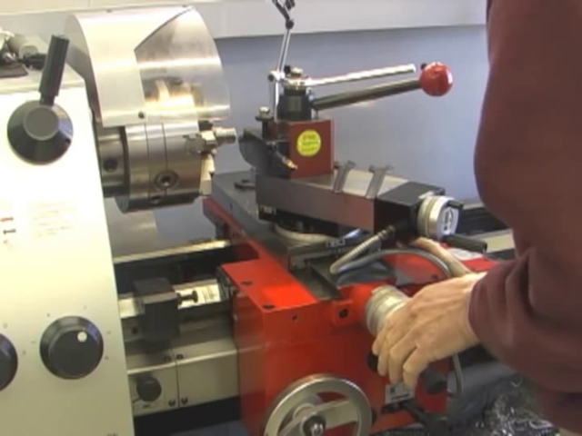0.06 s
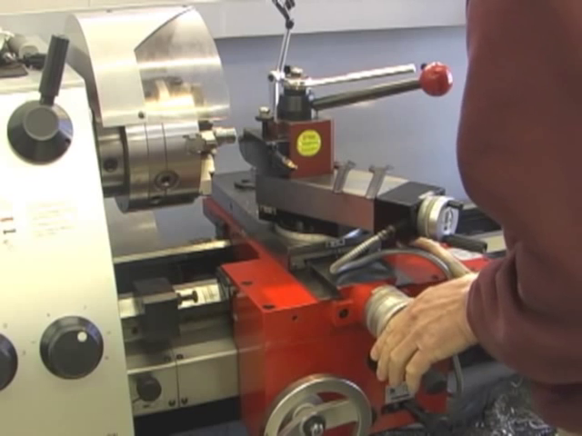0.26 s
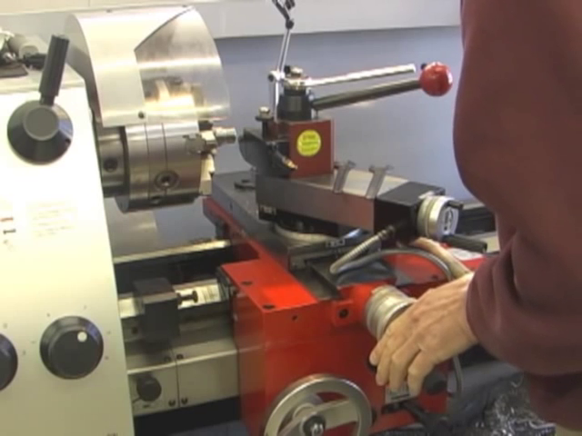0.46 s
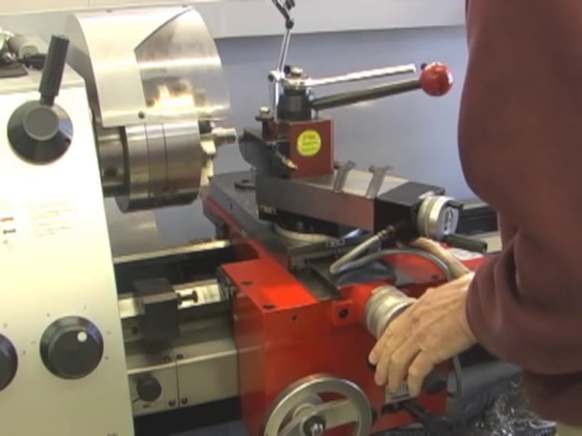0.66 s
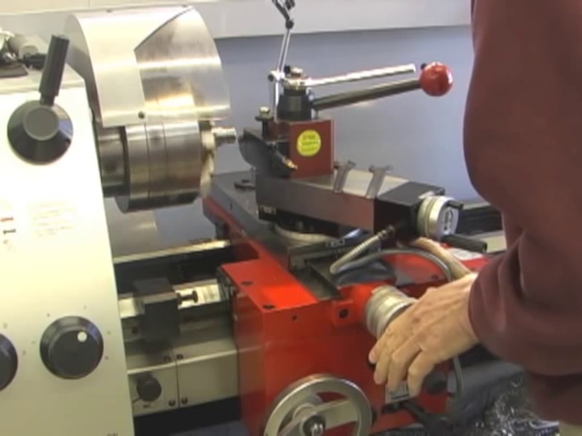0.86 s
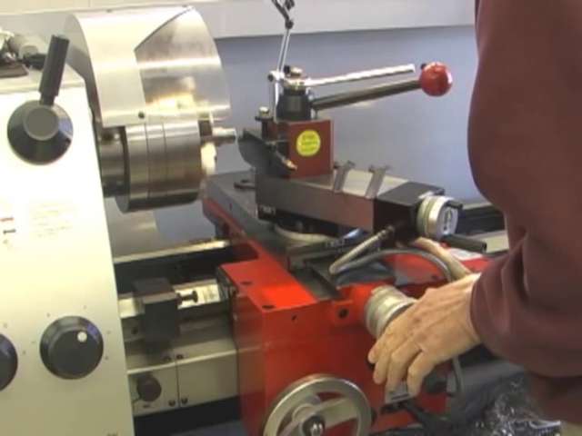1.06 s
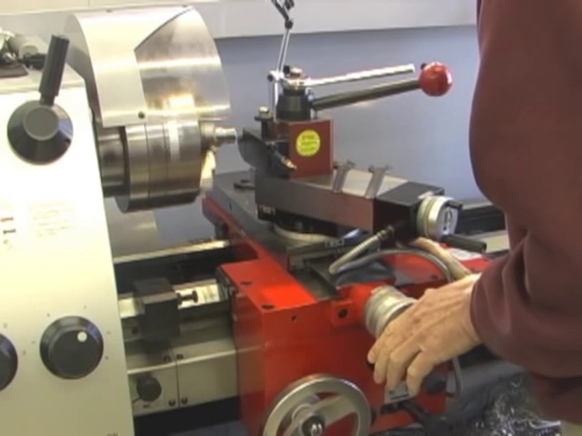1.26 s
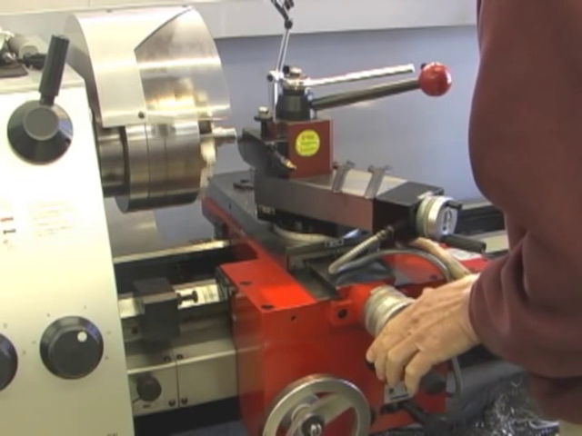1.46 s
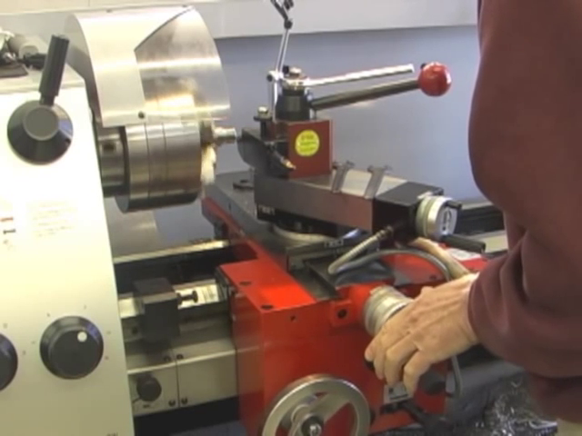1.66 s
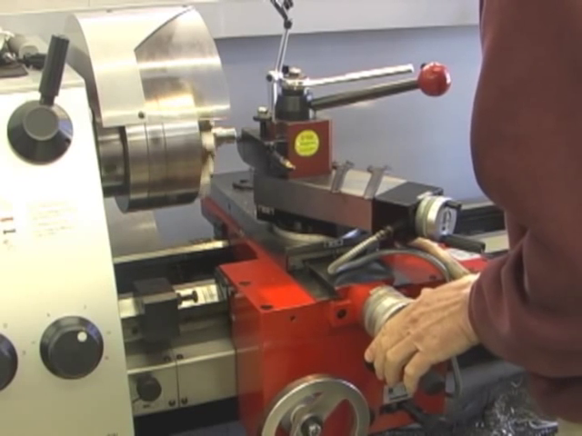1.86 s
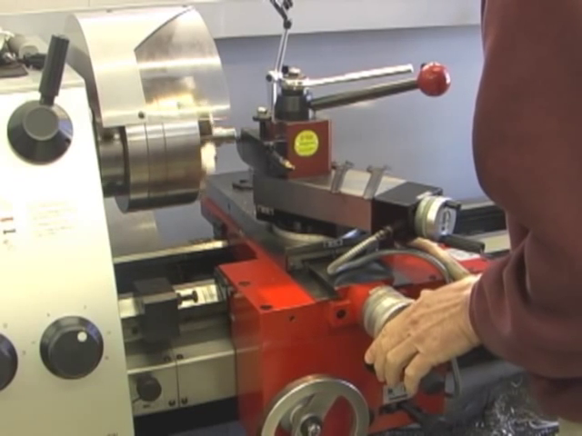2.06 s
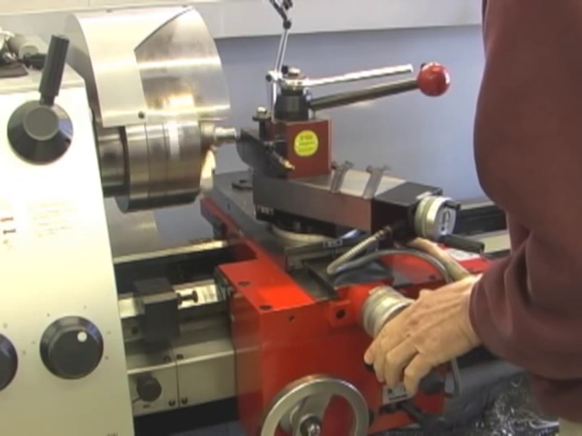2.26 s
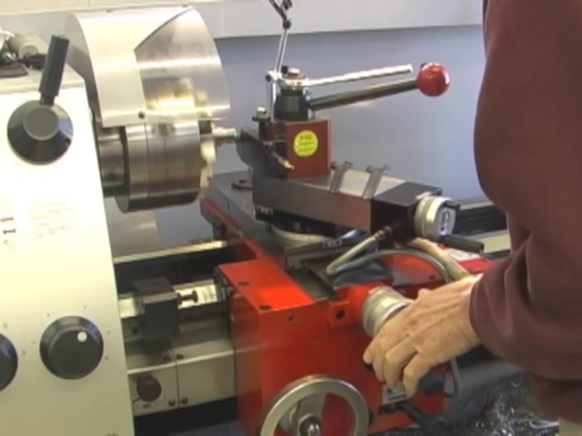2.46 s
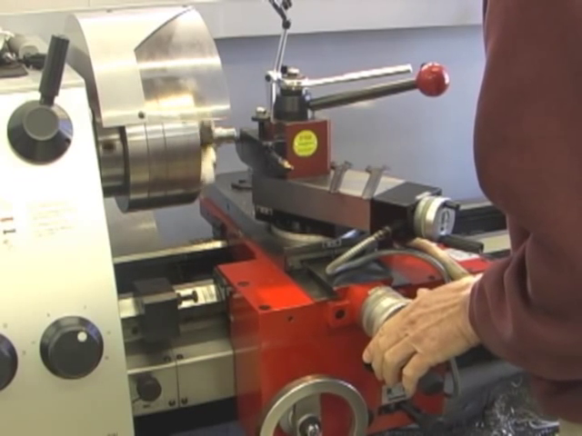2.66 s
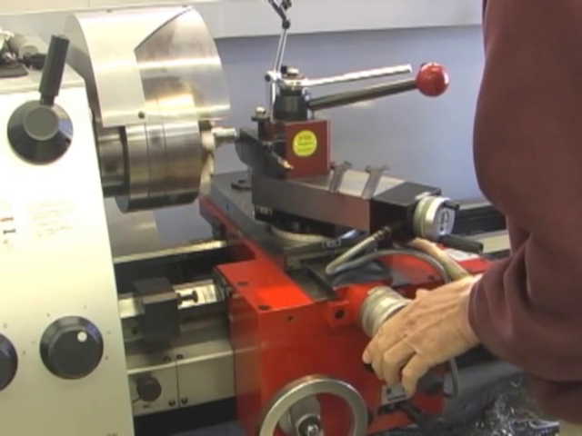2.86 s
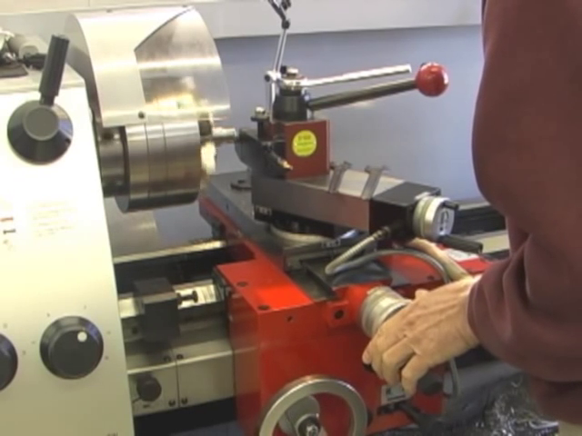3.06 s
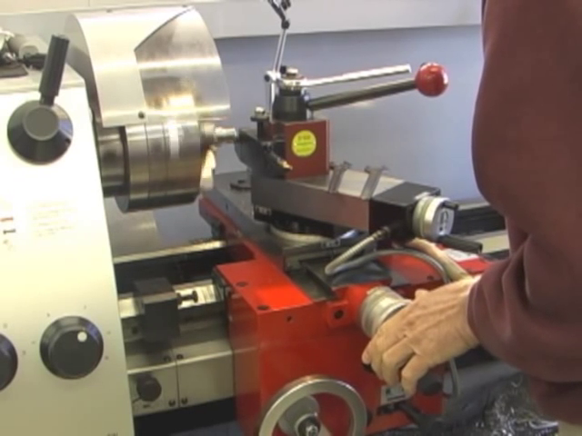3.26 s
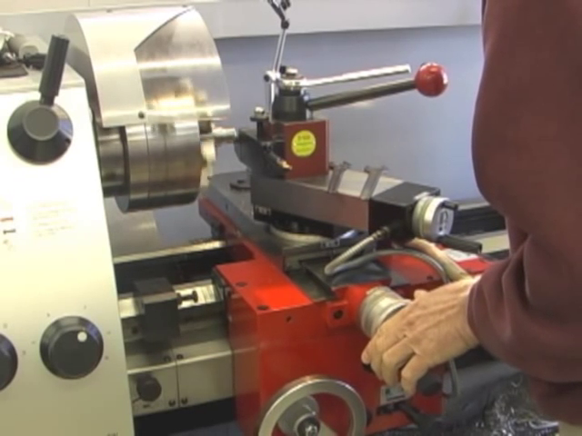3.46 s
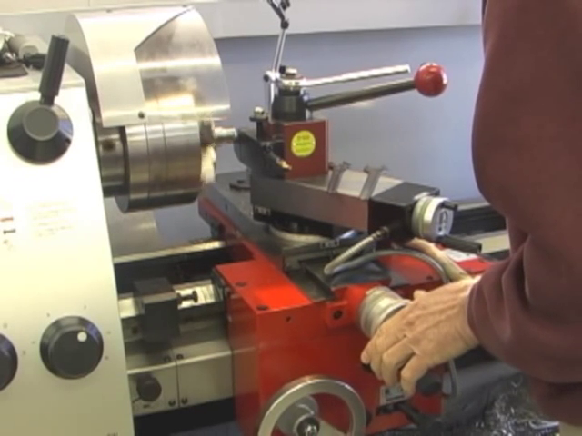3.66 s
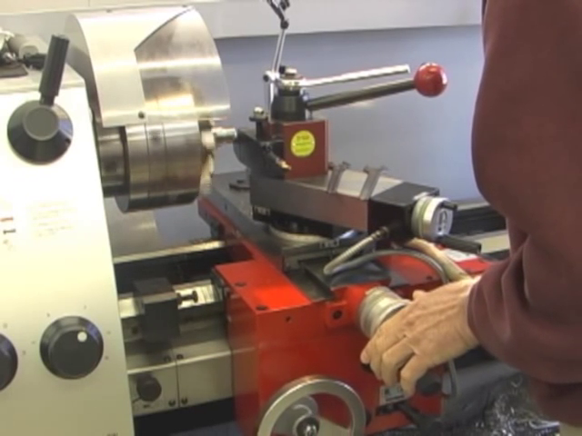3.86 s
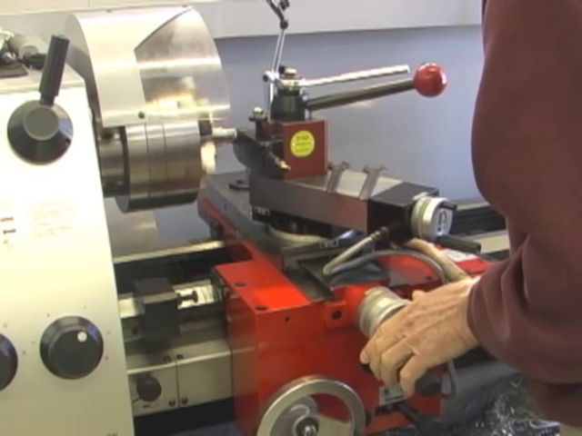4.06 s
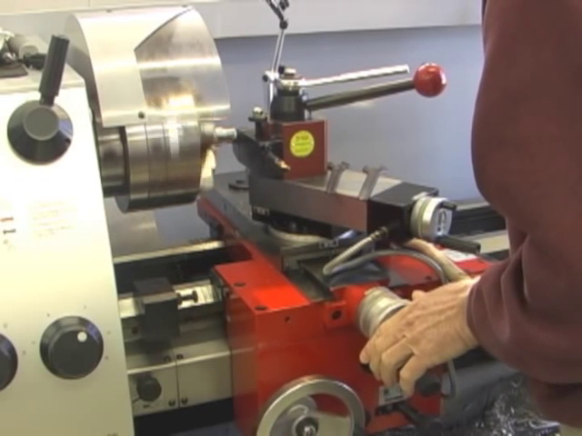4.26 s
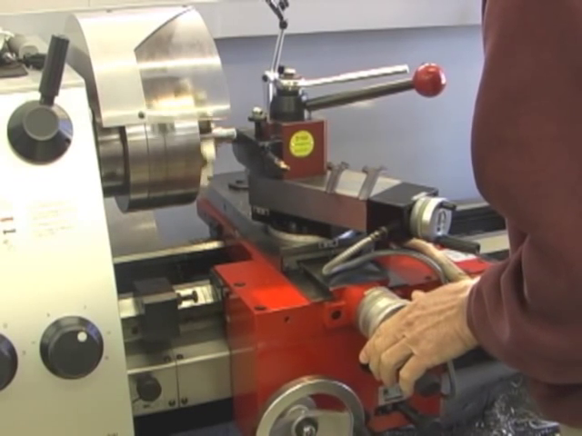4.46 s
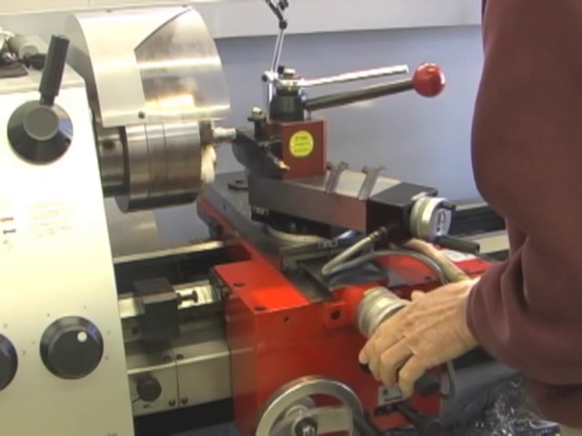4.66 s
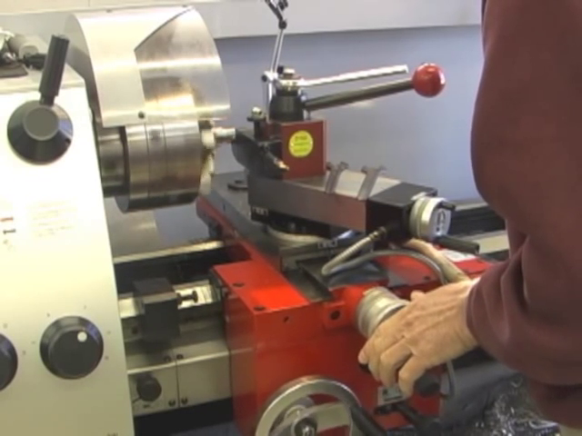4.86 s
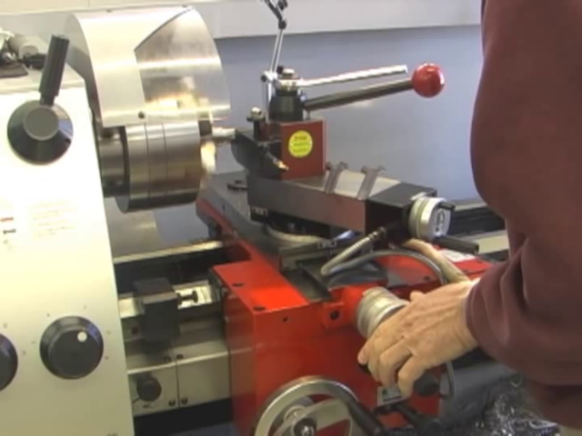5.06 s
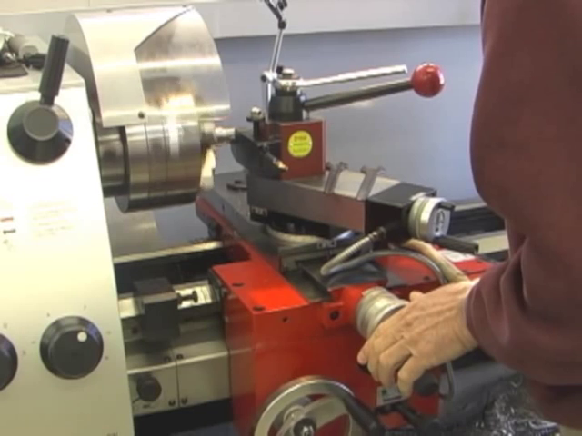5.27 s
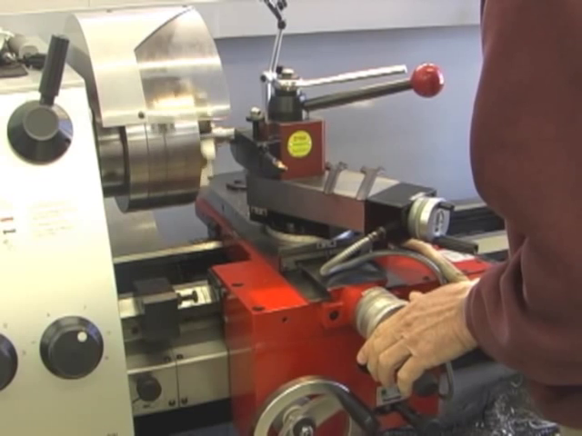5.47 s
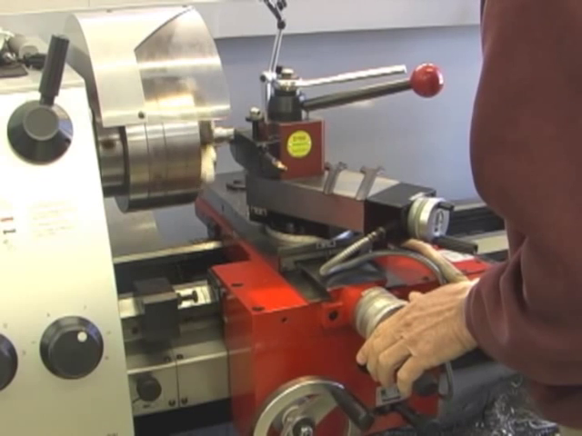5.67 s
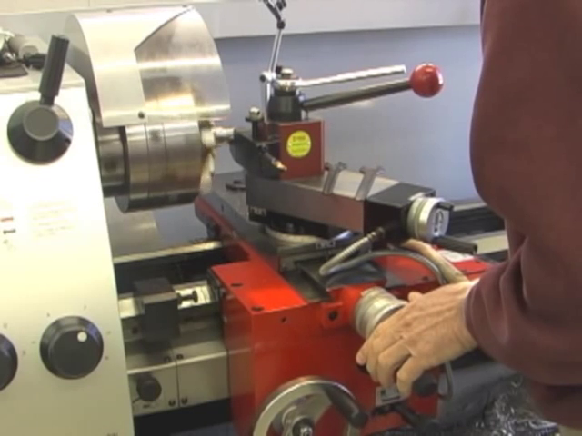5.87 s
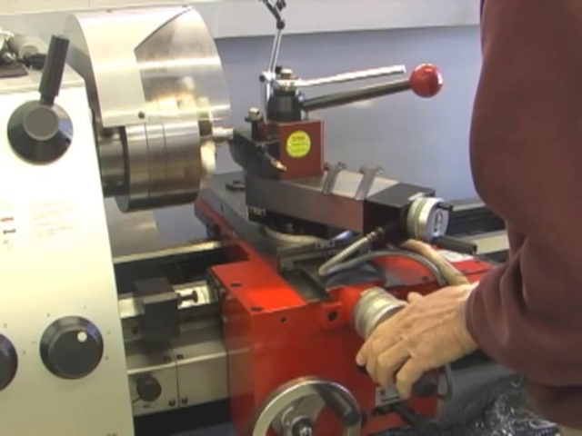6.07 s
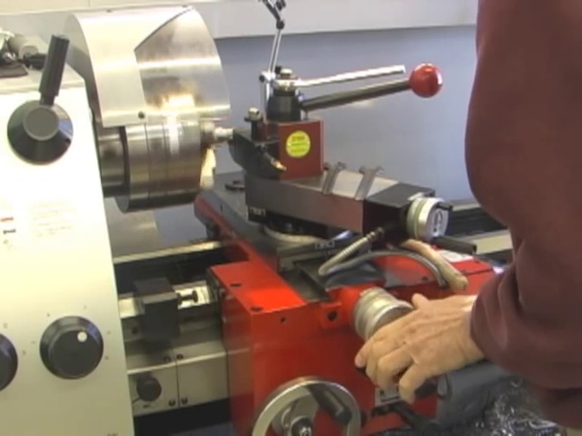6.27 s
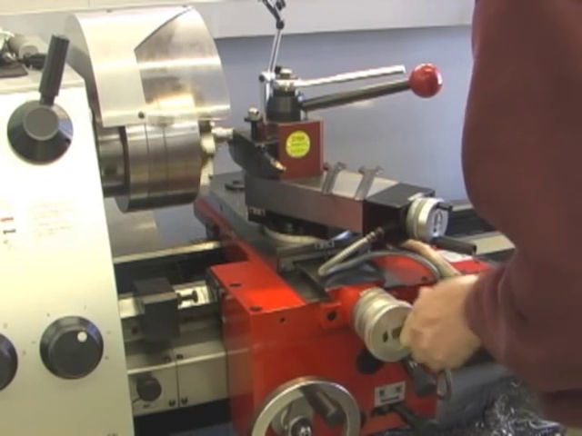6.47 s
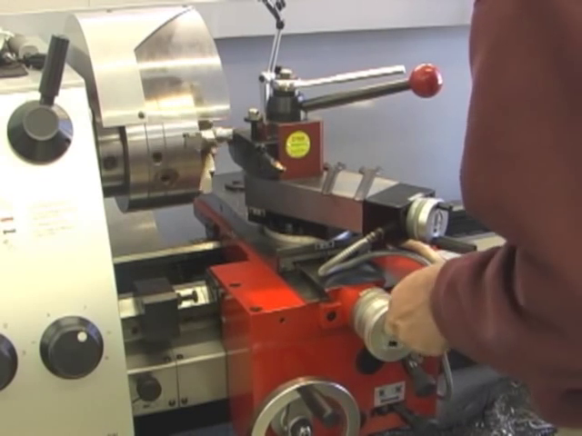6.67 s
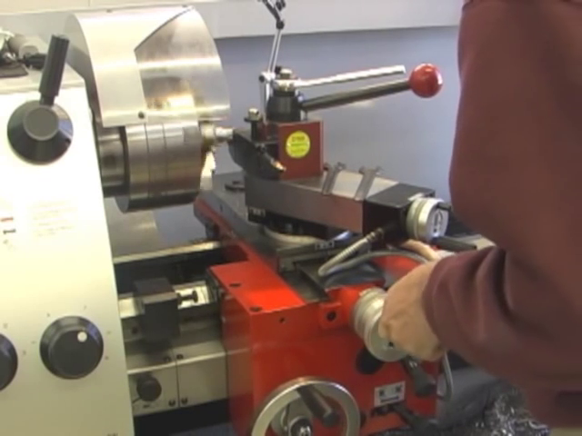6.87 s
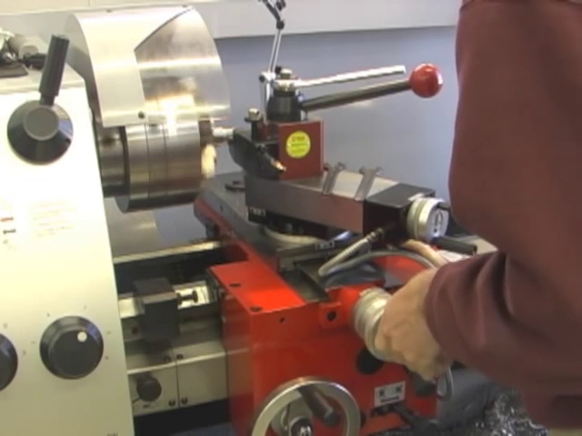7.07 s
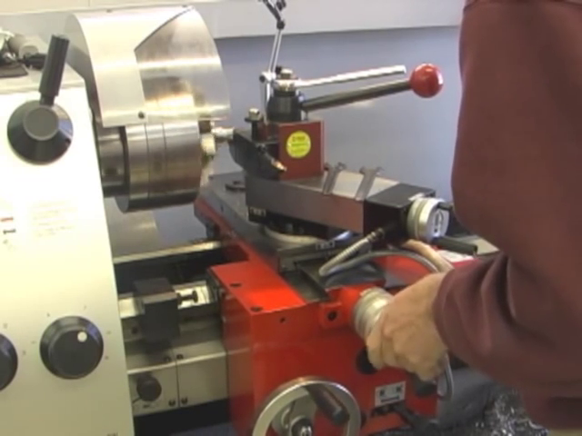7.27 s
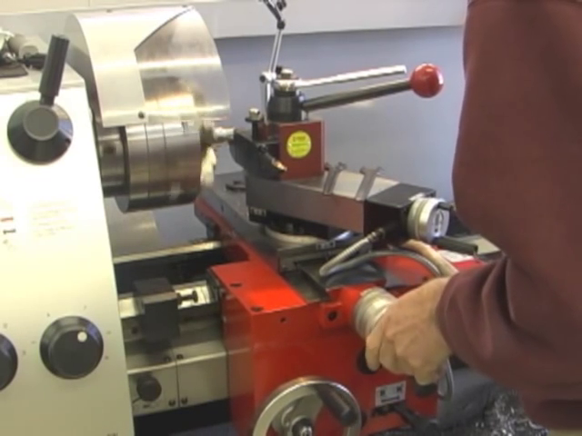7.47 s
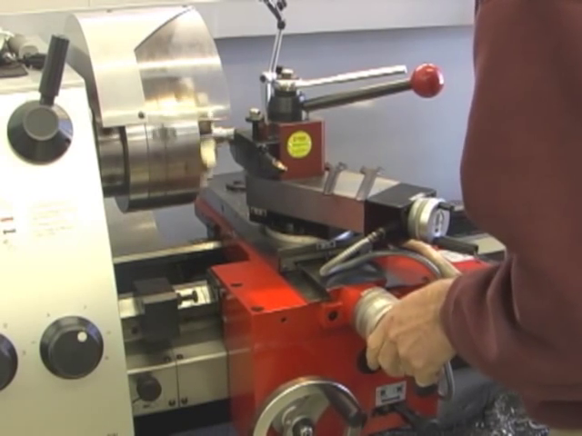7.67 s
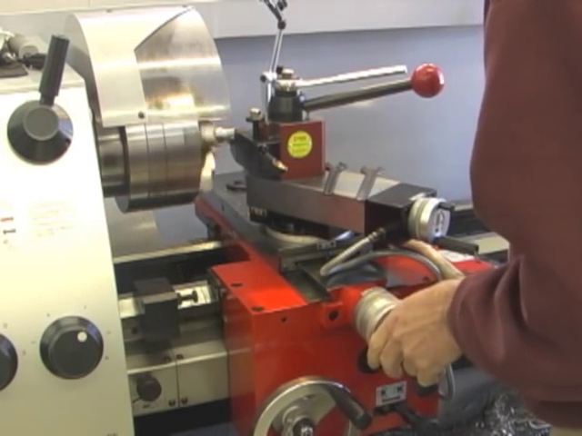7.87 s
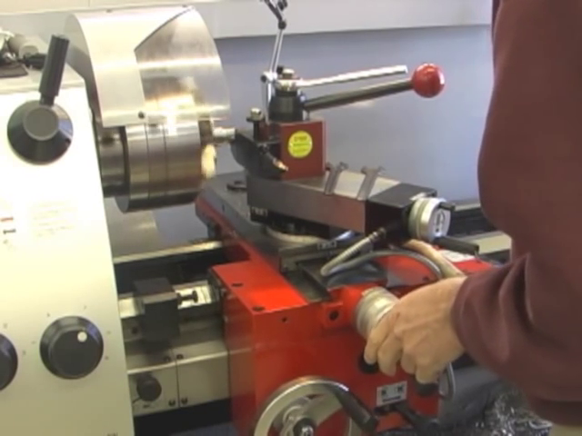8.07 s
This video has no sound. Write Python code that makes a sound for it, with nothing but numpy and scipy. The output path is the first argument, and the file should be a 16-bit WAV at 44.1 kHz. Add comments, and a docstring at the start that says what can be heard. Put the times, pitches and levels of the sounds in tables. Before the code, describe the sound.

Faint workshop air and soft fan tones open the sound. From 0.36 s a lever is gripped and snaps at about 0.5 s; at 0.6 s a contactor slams with a bright metallic clack and ringing box rattle. Dull gear knocks follow from 0.7 to 0.95 s as a lathe spins up, its gliding tones fanning out around a piercing whine near 8 kHz, with thinner tones near 12 kHz. Until 6.5 s it runs steadily: throbbing shrill whine, hiss, mid-pitched gear tones, slowly wavering low hum and rolling rumble. A tiny metallic chirp passes at 3.6 s. At 6.5 s lever clacks and a gear clunk accompany abrupt braking, tones sliding together by 6.74 s. Restart begins at once; a contactor slams at 6.82 s, gears rattle, and a clunk lands at 7.05 s. Reverse running continues to the end, with weaker central whine and fuller hum. Close stereo pickup, short room reverberation.

```python
"""In a small workshop with a running fan, a metal lathe is switched on, runs, brakes and starts again in reverse.
An inverter drives it: its pulses make the motor sing around 8 and 12 kHz, with sidebands that fan out with speed.
Hum and gear tones follow the drive frequency; filtered noise makes the rumble, coloured by the cabinet.
Lever, contactor and gear backlash clack and knock as short bursts of noise and dying tones."""
import sys
import numpy as np
from scipy import signal
from scipy.fft import rfft, irfft, next_fast_len
from scipy.io import wavfile
from scipy.ndimage import uniform_filter1d

SR = 44100
rng = np.random.default_rng(int(sys.argv[2]) if len(sys.argv) > 2 else 0)


def generate_wav(signal):
    """Clip the signal to [-1, 1] and save it as 16-bit WAV at the path in sys.argv[1]."""
    frames = np.transpose(np.atleast_2d(signal))
    scaled = np.clip(frames, -1, 1) * 32767
    pcm = np.round(scaled).astype(np.int16)
    wavfile.write(sys.argv[1], SR, pcm)


N = 357651
TIME = np.arange(N) / SR
SIZE = 2 * next_fast_len((N + SR // 4) // 2, True)
FREQS = np.maximum(np.fft.rfftfreq(SIZE, 1 / SR), 1)

# inverter output, joined by straight ramps: (time_s, drive_hz)
DRIVE_RAMPS = [(.68, 0), (.92, 35.56), (6.502, 35.56), (6.742, 0), (6.775, 0), (7.015, 35.56)]
FORWARD_AT_SPEED_S, REVERSE_AT_SPEED_S = DRIVE_RAMPS[1][0], DRIVE_RAMPS[5][0]
FULL_HZ, CARRIER_HZ = 35.56, 4000.85  # drive at full speed; switching carrier
BRAKE_S, REVERSE_S = 6.502, 6.76
BELT_TURNS = .1975  # per drive cycle
# surge of current at each start:
# (start_s, length_s, whine_db, whine_left_minus_right_db, stator_db, rumble_db)
START_SURGES = [(0.699, 0.23, -21.5, -5.5, -34, -34), (6.74, 0.31, -25.5, -1, -34, -55)]
# strongest weaker switching tones: (carrier_multiple, drive_multiple_added, forward_db, reverse_db)
STRONG_SIDEBANDS = [(1, -21, -63, -68), (1, -19, -60, -60), (1, -13, -62, -62), (1, -5, -62, -63),
                    (1, -3, -63, -64), (1, -1, -65, -60), (1, 3, -60, -57), (1, 5, -63, -62),
                    (1, 13, -56, -48), (1, 19, -55.5, -54), (1, 21, -63, -66), (2, -14, -48, -50),
                    (2, -10, -51, -49), (2, -8, -45, -50), (2, -6, -40, -50), (2, -4, -44, -42),
                    (2, 3, -47, -43), (2, 4, -47, -45), (2, 6, -47, -40), (2, 8, -49, -51),
                    (2, 14, -46, -51), (3, -5, -56, -58), (3, -1, -57, -53), (3, 5, -59, -59)]


def undb(db):
    """Decibels to gain."""
    return 10 ** (np.asarray(db) / 20)


def unit(x):
    """Scale to rms 1."""
    return x / np.sqrt(np.mean(x ** 2))


def curves(table):
    """Each column of a table as a line through time."""
    s, *columns = np.transpose(table)
    return [np.interp(TIME, s, column) for column in columns]


def colour(points):
    """A spectrum in dB on the frequency grid."""
    hz, db = np.transpose(points)
    return np.interp(np.log(FREQS), np.log(hz), db)


def shape(x, db):
    """Filter a sound to the given dB colour without smearing it backwards in time."""
    size = 8192
    cepstrum = irfft(np.log(undb(np.interp(np.fft.rfftfreq(size, 1 / SR), FREQS, db))))
    # folding the cepstrum forwards gives a response that starts at once
    cepstrum[1:size // 2] *= 2
    cepstrum[size // 2 + 1:] = 0
    response = irfft(np.exp(rfft(cepstrum)))
    response /= np.sqrt(np.sum(response ** 2))
    return signal.fftconvolve(x, response)[:len(x)]


def noise(db):
    """Noise of rms 1 with the given dB spectrum."""
    white = rfft(rng.standard_normal(SIZE))
    return unit(irfft(white * undb(db))[:N])


def walk(rate):
    """Smooth random wandering at about this many steps per second, spread near 1."""
    knots = rng.standard_normal(4096)
    line = np.interp(TIME * rate, np.arange(len(knots)), knots)
    return 1.2 * uniform_filter1d(line, int(SR / rate / 2) + 1)


def pan(db):
    """Left and right gains for a left minus right level difference."""
    return undb(np.array([[.5], [-.5]]) * db)


def dying(t60):
    """One second of exponential decay, falling 60 dB in t60 seconds."""
    return np.exp(-np.log(1000) * TIME[:SR] / t60)


def add(out, s, sound):
    """Mix a short sound in at time s."""
    start = int(s * SR)
    out[..., start:start + sound.shape[-1]] += sound[..., :N - start]


def clack(hz, rise_s):
    """A few strong cycles of metal meeting metal."""
    t = TIME[:SR]
    envelope = (t / rise_s * np.exp(1 - t / rise_s)) ** 2
    return envelope * np.sin(2 * np.pi * hz * t)


def ring(hz, spread_hz, t60, count=8):
    """A cluster of close modes that beat as they die away."""
    place, phase = rng.random((2, count, 1))
    partials = hz + spread_hz * ((np.arange(count)[:, None] + place) / count - .5)
    waves = np.sin(2 * np.pi * (partials * TIME[:SR] + phase))
    return dying(t60) * waves.sum(0) / np.sqrt(count)


def strike(spectrum_db, crack_t60, room_t60, room_db, rise_s, crack_db):
    """A crack and the room's diffuse tail in one colour, as mid and side; soft contact slows the rise."""
    crack, tail, side = rng.standard_normal((3, SR)) * (1 - np.exp(-TIME[:SR] / rise_s))
    room = undb(room_db) * dying(room_t60)
    mid = undb(crack_db) * crack * dying(crack_t60) + tail * room
    return np.array([shape(mid, spectrum_db), shape(side * room, spectrum_db)])


def surge(s, length):
    """Starting current, 0 to 1: it rises, holds and falls away as the motor reaches speed."""
    attack_s, release_s = 0.034, 0.12
    rise, fall = (TIME - s) / attack_s, (s + length - TIME) / release_s
    return np.clip(np.minimum(rise, fall), 0, 1)


def voltage(speed):
    """The inverter raises its voltage with speed, up to 1, and keeps a little at standstill."""
    standstill_share = 0.067
    return standstill_share + (1 - standstill_share) * speed ** 1.27


def settled(reverse):
    """How far the gears have settled since the run-up, 0 to 1."""
    settle_s = 0.1
    since_s = np.maximum(TIME - np.where(reverse, REVERSE_AT_SPEED_S, FORWARD_AT_SPEED_S), 0)
    return 1 - np.exp(-since_s / settle_s)


def cabinet():
    """The cabinet strengthens some pitches and weakens others, as a dB response."""
    # resonances and dips: (pitch_hz, width_hz, level_db)
    resonances = [(153.7, 12.4, -10), (184.7, 22, 7), (235, 25, 3.5), (295.3, 19.6, -17), (354, 14, 2),
                  (610, 35, -6.5), (672, 18, 7), (930, 23, -3), (993, 61, 5.5), (1214, 25, -12),
                  (1466, 96, 4), (1486, 27, -11), (1650, 110, 1.5), (1790, 21, -5), (2115, 27, -14),
                  (2410, 31, -14), (2490, 180, 4.5), (3300, 330, 2), (4220, 57, -3), (5080, 170, -10)]
    return sum(db / (1 + (2 * (FREQS - hz) / width) ** 2) for hz, width, db in resonances)


def smear(x, ramping, room_db, direct_db, t60=0.15):
    """While a tone glides, the room's echo of its earlier pitches beats against it."""
    tails = rng.standard_normal((2, SR)) * dying(t60)
    tails /= np.sqrt(np.sum(tails ** 2, axis=1, keepdims=True))
    echo = signal.fftconvolve(x * ramping, tails, axes=1)[:, :N]
    return x * undb(direct_db * ramping) + undb(room_db) * echo


def left_right(mid, side, running):
    """Left and right from mid and side: wide at first, then nearly central with some treble spread."""
    treble_hz, idle_width = 9500, 0.36
    treble = np.minimum((FREQS / treble_hz) ** 3, 1)
    running_spread = irfft(rfft(side, SIZE) * treble)[:N]
    spread = running * running_spread + (1 - running) * idle_width * side
    return np.array([mid + spread, mid - spread])


def workshop():
    """Room air as coloured noise and the steady tones of a cooling fan, as mid and side."""
    # colour of the room air: (pitch_hz, level_db per Hz)
    air_colour = [(25, -24), (60, -8), (110, 3), (160, 0), (200, 1.5), (250, 6), (330, 1.5), (480, 9),
                  (800, -3), (1500, 0.5), (2100, -4.5), (3200, -8), (5000, -13), (8600, -14), (14000, -30)]
    # the fan's tones: (pitch_hz, level_db)
    fan_tones = [(118.4, -67), (522.2, -64.5), (646.0, -70), (1254, -63), (1567, -63), (1674, -68)]
    air_gain = undb(-56)
    spectrum, drift = colour(air_colour), 0.49 * walk(7.4)
    fan = 0
    for hz, db in fan_tones:
        fan = fan + np.sqrt(2) * undb(db) * np.sin(2 * np.pi * hz * TIME + drift)
    return np.array([air_gain * noise(spectrum) + fan, air_gain * noise(spectrum)])


def squeak():
    """A tiny metallic chirp, made slightly rough by a trembling phase."""
    # the chirp: (peak_s, pitch_hz, level_db)
    chirp = (3.572, 5780, -41)
    s, hz, db = chirp
    swell = np.exp(-((TIME - s) / .009) ** 2)
    return undb(db) * swell * np.sin(2 * np.pi * hz * TIME + walk(300))


def knocks():
    """The lever is gripped and snaps through its detents, each contact a burst of noise."""
    # lever contacts: (start_s, level_db, tilt_db per octave, rise_s)
    lever_hits = [(0.361, -33.5, -5.5, 0.005), (.405, -42, 2, .012), (0.4683, -25.5, 4.5, 0.00028),
                  (0.501, -26.5, -4.5, 0.0013), (0.51, -30, -2.5, .002), (6.5065, -21.5, 0.7, 0.00022),
                  (6.555, -19, 0.5, 0.00041), (6.569, -15.5, -1.6, .001), (6.582, -20.5, -5, 0.0009)]
    # their common colour: (pitch_hz, level_db)
    lever_colour = [(25, -56), (60, -21), (200, -8), (500, -6), (1500, 3.5), (2600, -7.5), (4500, -6.5),
                    (6000, -11), (8500, -13.5), (14000, -29)]
    out, body = np.zeros((2, N)), colour(lever_colour) + 0.4 * cabinet()
    octaves = np.log2(np.maximum(FREQS, 400) / 1000)
    for s, db, tilt, rise_s in lever_hits:
        hit = strike(body + tilt * octaves, crack_t60=0.052, room_t60=0.46, room_db=-8.0,
                     rise_s=rise_s, crack_db=-1.5)
        add(out, s, undb(db) * hit)
    return out


def contactor():
    """The armature slams shut with a solid clack and bounces; then its steel box rattles and rings on."""
    # closings: (start_s, level_db, extra_ringing_db)
    closings = [(0.606, -13.8, 0), (6.8226, -12.6, 1.5)]
    # colour of the rattle: (pitch_hz, level_db)
    box_colour = [(25, -42), (100, -16), (500, -14), (1000, -7.5), (1700, -4.5), (2600, -9.5), (3150, -11),
                  (3700, -6.5), (4600, -4), (5300, -3.5), (6200, -16.5), (7000, -14.5), (8500, -5.5),
                  (10500, -21.5), (15000, -61)]
    # parts of the armature's clack: (pitch_hz, level_db, rise_s)
    armature_parts = [(4680, 6.3, .0006), (8700, -5, .0004), (13500, -12, .0005)]
    # modes of the steel box: (pitch_hz, spread_hz, level_db, t60_s)
    box_modes = [(1343, 70, -21, 0.43), (3070, 99, -22.5, 0.8), (3340, 120, -23, 0.41),
                 (3810, 170, -21, 0.37), (4300, 73, -21, 0.45), (4820, 110, -19, 0.7),
                 (5030, 150, -16, 0.57), (5170, 60, -17, 0.65), (5290, 54, -19, 0.47),
                 (5780, 240, -21, 0.3)]
    # softer clack as it drops out: (start_s, pitch_hz, level_db, rise_s)
    release = (6.5685, 4450, -14.5, .002)
    bounce_s, bounce_db, body_lag_s = 0.003, -22, 0.001327
    out, body = np.zeros((2, N)), colour(box_colour)
    armature = sum(undb(db) * clack(hz, rise_s) for hz, db, rise_s in armature_parts)
    for s, db, ring_db in closings:
        add(out[0], s, undb(db) * armature)
        add(out[0], s + bounce_s, undb(db + bounce_db) * armature)
        rattle = strike(body, crack_t60=0.036, room_t60=0.51, room_db=-10.0, rise_s=0.001, crack_db=-1.5)
        add(out, s + body_lag_s, undb(db) * rattle)
        for hz, spread_hz, mode_db, t60 in box_modes:
            add(out[0], s, undb(db + ring_db + mode_db) * ring(hz, spread_hz, t60))
    s, hz, db, rise_s = release
    add(out[0], s, undb(db) * clack(hz, rise_s))
    return out


def clunks():
    """The gears take up their play with a dull ring; the belt thumps as the torque changes."""
    # gear backlash: (start_s, level_db, tilt_db per octave)
    backlash = [(.469, -40, -5), (.688, -24.5, 0.5), (.706, -25, -2), (.741, -22, 2.5), (.762, -23.5, -1.5),
                (.786, -25, -4.5), (.952, -23, 2), (6.5055, -17.5, -1), (6.547, -29, -5), (7.048, -16, 0.5)]
    # its colour: (pitch_hz, level_db)
    clunk_colour = [(25, -45), (100, -11), (250, -4), (500, 3.5), (750, 1.5), (1400, -7), (2000, -13),
                    (3000, -27), (14000, -53)]
    # modes of the gears: (pitch_hz, spread_hz, level_db, t60_s)
    gear_modes = [(366.5, 62, -9.5, 0.28), (497.5, 26, -10, 0.24), (571, 68, -11.5, 0.052)]
    # belt thumps: (peak_s, level_db)
    belt_thumps = [(0.768, -38), (6.627, -29.5), (6.985, -32)]
    thump_hz, thump_width_s = 109, 0.013
    out, body = np.zeros((2, N)), colour(clunk_colour) + cabinet()

    def octaves(hz):
        """Octaves from 500 Hz, where the tilt leaves the level alone."""
        return np.log2(np.clip(hz, 150, 1200) / 500)

    for s, db, tilt in backlash:
        hit = strike(body + tilt * octaves(FREQS), crack_t60=0.04, room_t60=0.91, room_db=-9.5,
                     rise_s=0.0014, crack_db=1.5)
        add(out, s, undb(db) * hit)
        for hz, spread_hz, mode_db, t60 in gear_modes:
            add(out[0], s, undb(db + mode_db + tilt * octaves(hz)) * ring(hz, spread_hz, t60))
    for s, db in belt_thumps:
        swell = np.exp(-((TIME - s) / thump_width_s) ** 2)
        out[0] += undb(db) * swell * np.sin(2 * np.pi * thump_hz * (TIME - s))
    return out


def clatter():
    """Loose gear teeth rattle at random against each other while the chuck gathers speed."""
    # rattle in each run-up: (start_s, length_s, level_db)
    rattles = [(0.78, .25, -35), (6.877, .27, -37)]
    # its colour: (pitch_hz, level_db)
    rattle_colour = [(25, -40), (200, 2), (600, -7), (1100, -6), (1500, 4.5), (2000, -8), (2800, -17),
                     (4000, -27), (7000, -46), (14000, -60)]
    hits_per_s, scatter_db, t60 = 170, 4, 0.024
    struck = rng.random(N) < hits_per_s / SR
    hits = struck * undb(scatter_db * np.clip(rng.standard_normal(N), -2, 2))
    energy = np.maximum(signal.fftconvolve(hits ** 2, dying(t60) ** 2)[:N], 0)
    bursts = np.sqrt(energy) * rng.standard_normal(N)
    rattle = unit(shape(bursts, colour(rattle_colour) + cabinet()))
    return rattle * sum(undb(db) * surge(s, length) for s, length, db in rattles)


def load(speed):
    """Strength of the rumble: it follows speed, swells with each start and again as the run-up ends."""
    full_db, standstill_share = -34, 0.34
    overrun_db, overrun_lag_s, overrun_width_s = -30.5, 0.018, 0.065
    power = (undb(full_db) * (standstill_share + (1 - standstill_share) * np.sqrt(speed))) ** 2
    for s, length, _, _, _, db in START_SURGES:
        power = power + undb(db) ** 2 * surge(s, length)
    # the gears chatter when the chuck overruns them
    for at_speed_s in (FORWARD_AT_SPEED_S, REVERSE_AT_SPEED_S):
        swell = np.exp(-((TIME - at_speed_s - overrun_lag_s) / overrun_width_s) ** 2)
        power = power + undb(overrun_db) ** 2 * swell
    return np.sqrt(power)


def rumble(angle, speed):
    """Rolling bearings and meshing teeth ring the cabinet; slow turning adds a low groan. Mid and side."""
    # colour of the rumble: (pitch_hz, level_db per Hz)
    rumble_colour = [(25, -38), (50, -21), (70, -24), (110, -3), (190, -6), (450, 2.5), (800, -5),
                     (1500, -6), (2000, -14), (2700, -27), (4400, -19.5), (5300, -25), (10000, -68.5),
                     (14000, -51)]
    grain, flutter, belt_depth = 0.12, 0.075, 0.018
    groan_db, groan_top_hz = -4, 260
    roughness = np.exp(grain * walk(300) + flutter * walk(60))
    contact = unit(roughness * (1 + belt_depth * np.sin(BELT_TURNS * angle)))
    body = colour(rumble_colour) + cabinet()
    rolling = shape(rng.standard_normal(N) * contact, body)
    low_band = -10 * np.log10(1 + (FREQS / groan_top_hz) ** 4 + (70 / FREQS) ** 4)
    slowness = 2 * np.sqrt(np.maximum(1 - speed, 0))
    groan = noise(body + low_band) * undb(groan_db) * slowness
    return np.array([rolling + groan, noise(body)]) * load(speed)


def hum(angle, speed, reverse):
    """The motor's two low hums and a thin whistle from the gears waver, swell and fade."""
    # pitches of the two hums at full speed: (lower_hz, upper_hz)
    hum_pitches = (214.0, 360.0)
    # their levels at full speed: (time_s, lower_db, upper_db)
    hum_levels = [(1.2, -46, -55), (1.5, -44, -53), (2.08, -43, -45), (2.35, -54, -46), (3.15, -50, -47),
                  (3.45, -46.5, -46), (4.45, -55, -47), (4.9, -40.5, -46.5), (5.25, -43.5, -48),
                  (5.7, -57, -50.5), (6.4, -47, -44), (7.15, -39, -39), (7.45, -39.5, -40), (7.7, -39, -40),
                  (7.9, -40, -36), (8.0, -41, -43)]
    # the whistle's level at full speed: (time_s, level_db)
    whistle_levels = [(1.0, -64), (1.6, -63), (3.3, -59.5), (6.4, -54.5), (6.9, -69)]
    whistle_hz = 3412.3
    flutter, jitter = 0.27, 0.17
    out = 0
    for hz, db in zip((*hum_pitches, whistle_hz), curves(hum_levels) + curves(whistle_levels)):
        phase = hz / FULL_HZ * angle + jitter * walk(11)
        out = out + undb(db) * (1 + flutter * walk(14)) * np.cos(phase)
    return np.sqrt(2) * out * speed ** 2 * settled(reverse)


def tones(angle, speed, reverse):
    """Magnetic hum and gear mesh, locked to the drive and a little unsteady."""
    # tones at full speed: (pitch_hz, forward_db, reverse_db, slow_wander_db)
    machine_tones = [(71.3, -64, -63, 1.7), (142.7, -56, -60, 2), (179.3, -50, -55, 2.5),
                     (443.4, -52, -45.5, 3), (568.6, -37, -56, .45), (621.8, -47, -55, 1.7),
                     (639.6, -37.3, -42, .7), (719.7, -53, -44, 1.2), (978.1, -47, -55, 1.7),
                     (1257.3, -45, -42, 1.2), (1329.0, -51, -51, 1.7), (1466.9, -45.3, -51, 1.7),
                     (1616.3, -54, -66, 1.7), (1917.5, -53, -55, 1.7), (1988.8, -58, -63, 1.7),
                     (2040, -64, -66, 1.7), (2153, -65, -68, 1.7), (2446, -67, -68, 1.7),
                     (2519, -66, -65, 1.7)]
    flutter, jitter, drift = 0.097, 0.28, 0.34
    out = 0
    for hz, forward_db, reverse_db, wander_db in machine_tones:
        gain = undb(forward_db) * (1 - reverse) + undb(reverse_db) * reverse
        unsteady = jitter * walk(14) + drift * walk(2.52)
        phase = hz / FULL_HZ * angle + unsteady + 2 * np.pi * rng.random()
        sway = undb(wander_db * walk(3.09)) + flutter * walk(32)
        out = out + gain * np.cos(phase) * sway
    return np.sqrt(2) * out * speed ** 2 * settled(reverse)


def switching_hash(speed):
    """A hiss hugs the switching tones, and grows while the motor is pulled up to speed."""
    # colour of the hiss: (pitch_hz, level_db per Hz)
    hiss_colour = [(3700, -48), (3900, -23), (4130, -16), (4250, -34), (6500, -26), (7250, -17),
                   (7430, -5.5), (7600, -16.5), (7850, 7), (8000, -1.5), (8200, -10), (8400, -13),
                   (8570, -14), (8850, -7), (9600, -55), (11100, -43), (12000, -15), (13000, -42),
                   (13700, -56)]
    running_db, ramp_db = -37.5, -37
    pulling = uniform_filter1d(1. * (np.gradient(speed) > 0), int(.06 * SR))
    level = undb(running_db) * speed + undb(ramp_db) * pulling * np.sqrt(speed)
    return noise(colour(hiss_colour)) * pan(-1.5) * level


def boost(angle, speed, braking):
    """Odd carrier multiples sound at starts and halt; the motor frame sings as current or braking jolts it."""
    # singing of the motor frame: (start_s, level_db, mode_spread_hz)
    frame_rings = [(0.71, -32.5, 110), (6.568, -28.5, 522), (6.786, -42, 300)]
    frame_hz = 4410
    start_db, hold_db = -44.5, -41
    third_db, cluster_db, cluster_hz = -3, 2, 330
    starting = undb(start_db) * sum(surge(s, length) for s, length, *_ in START_SURGES)
    holding = undb(hold_db) * braking * (1 - speed) ** 4  # the halted motor is held
    carrier = 2 * np.pi * CARRIER_HZ * TIME
    # a whistle at the carrier, then a tone in a tight cluster of noise at three times its pitch
    out = (starting + holding) * np.cos(carrier + angle)
    cluster = noise(-30 * np.log10(1 + ((FREQS - 3 * CARRIER_HZ) / cluster_hz) ** 2))
    out += starting * (undb(third_db) * np.cos(3 * carrier - angle) + undb(cluster_db) * cluster)
    for s, db, spread_hz in frame_rings:
        add(out, s, undb(db) * ring(frame_hz, spread_hz, t60=0.41))
    return out


def comb():
    """Weak sidebands at every second drive multiple: even ones at even carrier multiples, odd at odd."""
    # level of each comb: (carrier_multiple, centre_db, slope_db per drive multiple outward)
    comb_levels = [(2, -59.5, -0.06), (3, -62, -0.1931)]
    reach, scatter_db = 21, 6.5  # drive multiples to either side; random spread of the levels
    taken = [(multiple, order) for multiple, order, _, _ in STRONG_SIDEBANDS]
    taken += [(2, order) for order in (-16, -2, 0, 2, 16)]  # the whine and the stator pair
    rows = []
    for multiple, db, slope_db in comb_levels:
        for order in range(-reach, reach + 1):
            if (multiple + order) % 2 == 0 and (multiple, order) not in taken:
                levels = db + slope_db * abs(order) + scatter_db * rng.standard_normal(2)
                rows.append((multiple, order, *levels))
    return rows


def sidebands(angle, speed, reverse):
    """Weaker switching tones; standing waves make them swell and fade differently at each port."""
    wander_db, flutter = 0.6, 0.078
    mid_pan_db, top_pan_db = -2, 6  # left minus right
    out = np.zeros((2, N))
    # nine random swells are shared out among the tones
    sways = [undb(wander_db * walk(2.3)) * (1 + flutter * walk(40)) for _ in range(9)]
    for multiple, order, forward_db, reverse_db in STRONG_SIDEBANDS + comb():
        phase = 2 * np.pi * (multiple * CARRIER_HZ * TIME + rng.random()) + order * angle
        tone = np.where(reverse, undb(reverse_db), undb(forward_db)) * np.cos(phase)
        sides = pan(top_pan_db if multiple > 2 else mid_pan_db)
        for channel, pick in enumerate(rng.permutation(len(sways))[:2]):
            out[channel] += sides[channel] * tone * sways[pick]
    return np.sqrt(2) * out * speed ** 1.6


def stator(angle, speed, reverse, braking):
    """Two strong sidebands part from the whine as the motor gathers speed; starts and braking swell them."""
    # the favoured pair:
    # (drive_cycles_off_the_whine, forward_db, reverse_db, braking_db, left_minus_right_db)
    favoured_pair = [(-16, -44, -32.5, -27.5, 0), (16, -44, -37, -43, 11)]
    flutter, wander_db = 0.16, 1.5
    out, carrier = 0, 2 * np.pi * 2 * CARRIER_HZ * TIME
    for order, forward_db, reverse_db, brake_db, pan_db in favoured_pair:
        gain = undb(forward_db) * (1 - reverse) + undb(reverse_db) * reverse
        gain = (gain + undb(brake_db) * braking) * voltage(speed)
        for s, length, _, _, db, _ in START_SURGES:
            gain = gain + surge(s, length) * (undb(db) - gain)
        wander = undb(wander_db * np.array([walk(2.46), walk(1.7)]))
        sway = (1 + flutter * walk(45)) * wander
        out = out + gain * pan(pan_db) * sway * np.cos(carrier + order * angle)
    return np.sqrt(2) * out


def whine(angle, speed, reverse):
    """Twice the carrier, throbbing at twice the drive frequency; shaft and belt make it flutter."""
    # standing waves shift the forward whine:
    # (time_s, level_db before its overall gain, left_minus_right_db)
    whine_drift = [(1.0, -24, -4), (1.66, -23, -4.5), (2.48, -27, -7.5), (3.12, -28, -3.5), (3.81, -26, -4),
                   (4.75, -26, -3.5), (6.28, -25.5, -8), (6.48, -29.5, -9.5)]
    overall_db, reverse_level_db, reverse_pan_db = 1.55, -32, -13
    shaft_turns = .4859  # per drive cycle: four poles, less slip
    flutter, belt_depth, shaft_depth = 0.039, 0.014, 0.019
    forward_slip, slow_throb = 0.52, 0.11  # radians at full speed; throb left at standstill
    level_db, pan_db = curves(whine_drift)
    forward_gain = undb(level_db + overall_db) * pan(pan_db)
    reverse_gain = undb(reverse_level_db) * pan(reverse_pan_db)
    gain = (forward_gain * (1 - reverse) + reverse_gain * reverse) * voltage(speed)
    for s, length, db, start_pan_db, _, _ in START_SURGES:
        gain = gain + surge(s, length) * (undb(db) * pan(start_pan_db) - gain)
    centre, lower, upper = 1.12, .42, .78
    carrier = 2 * np.pi * 2 * CARRIER_HZ * TIME
    # the centre tone slips against its neighbours, a quarter cycle in reverse, which smooths the throb
    slip = np.where(reverse, np.pi / 2, forward_slip) * speed ** 4
    throb = slow_throb + (1 - slow_throb) * speed
    neighbours = lower * np.cos(carrier - 2 * angle) + upper * np.cos(carrier + 2 * angle)
    tone = centre * np.cos(carrier + slip) + throb * neighbours
    belt = np.sin(BELT_TURNS * angle) + np.sin(2 * BELT_TURNS * angle + 1)
    turning = 1 + belt_depth * belt + shaft_depth * np.sin(shaft_turns * angle)
    sway = 1 + flutter * (walk(110) + 0.68 * np.array([walk(45), walk(46)]))
    return gain * tone * turning * sway


def scene():
    """One drive frequency moves every tone of the motor and gears."""
    drive_hz, = curves(DRIVE_RAMPS)
    angle = 2 * np.pi * np.cumsum(drive_hz) / SR  # drive phase in radians
    speed = drive_hz / FULL_HZ  # 0 to 1
    reverse, powered = 1. * (TIME > REVERSE_S), angle > 0
    braking = uniform_filter1d((TIME > BRAKE_S) * (1 - reverse), int(0.042 * SR))
    ramping = uniform_filter1d(1. * (powered & (speed < 1)), int(.03 * SR))
    # side level fades over 0.1 s from the first start, leaving mainly treble width
    running = np.clip((TIME - DRIVE_RAMPS[0][0]) / .1, 0, 1)

    mechanics = workshop() + knocks() + contactor() + clunks() + rumble(angle, speed) * powered
    drivetrain = clatter() + hum(angle, speed, reverse) + tones(angle, speed, reverse)
    gliding = sidebands(angle, speed, reverse) + stator(angle, speed, reverse, braking)
    inverter = switching_hash(speed) + boost(angle, speed, braking)
    inverter = inverter + smear(gliding * powered, ramping, room_db=1, direct_db=-3.0)
    inverter = inverter + smear(whine(angle, speed, reverse) * powered, ramping, room_db=-12, direct_db=4.0)
    return left_right(*mechanics, running) + squeak() + drivetrain + inverter * powered


def record(dry):
    """Two microphone ports a little apart differ in phase in the treble; the recorder cuts the top."""
    # phase gap between the ports: (pitch_hz, left_lead_radians)
    port_phase = [(100, 0), (2800, 0), (4500, -0.024), (8000, -0.82), (10000, 0.94), (12000, -1.62)]
    top_hz = 14400
    lead = np.array([[.5], [-.5]]) * colour(port_phase)
    heard = irfft(rfft(dry, SIZE) * np.exp(1j * lead))[:, :N]
    return signal.sosfilt(signal.ellip(8, .2, 70, top_hz, fs=SR, output="sos"), heard)


dry = scene()
out = record(dry)
generate_wav(out)
```